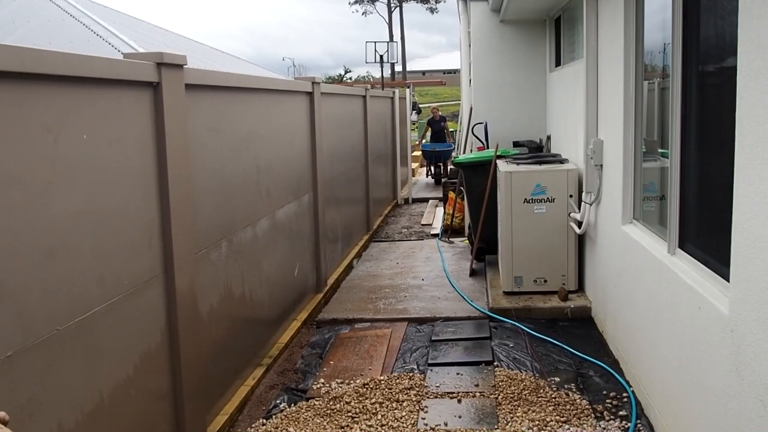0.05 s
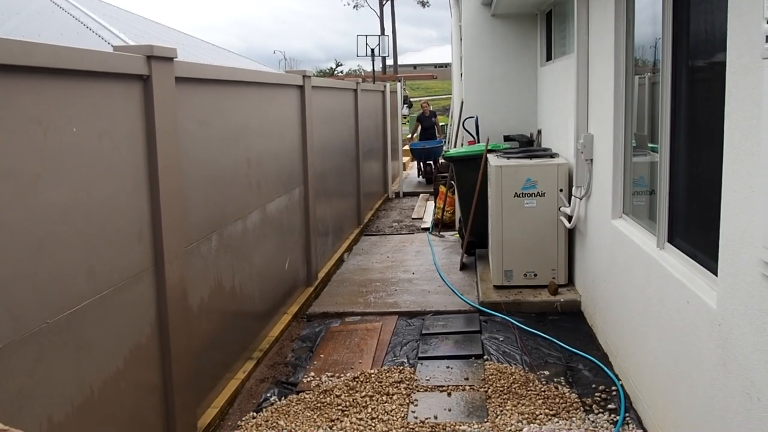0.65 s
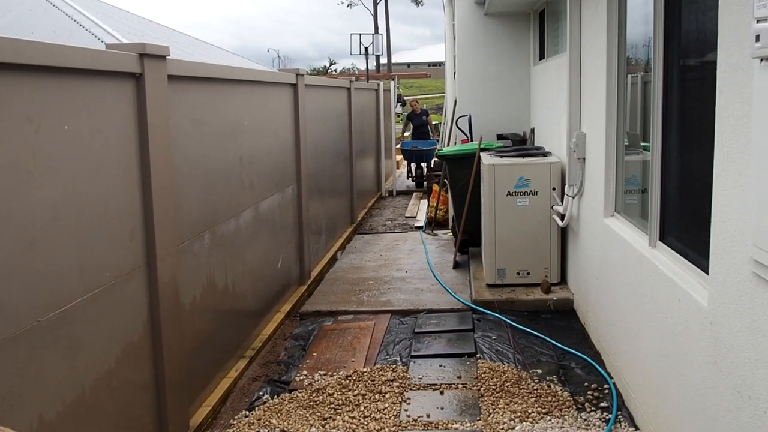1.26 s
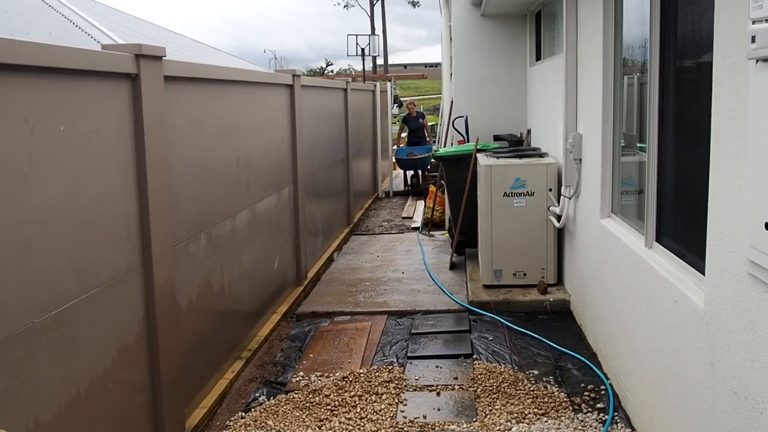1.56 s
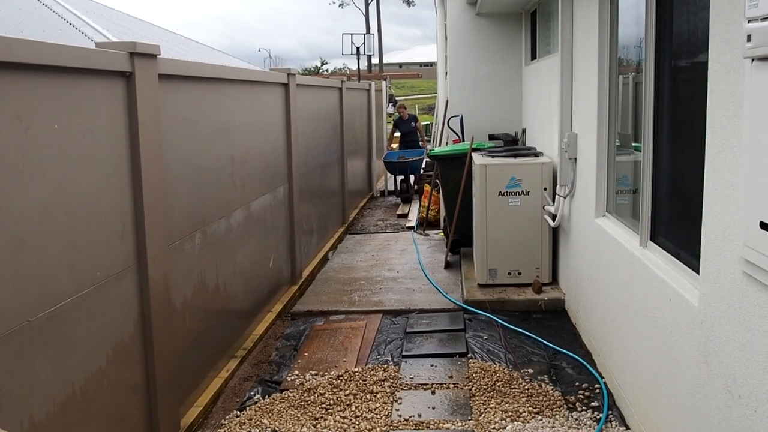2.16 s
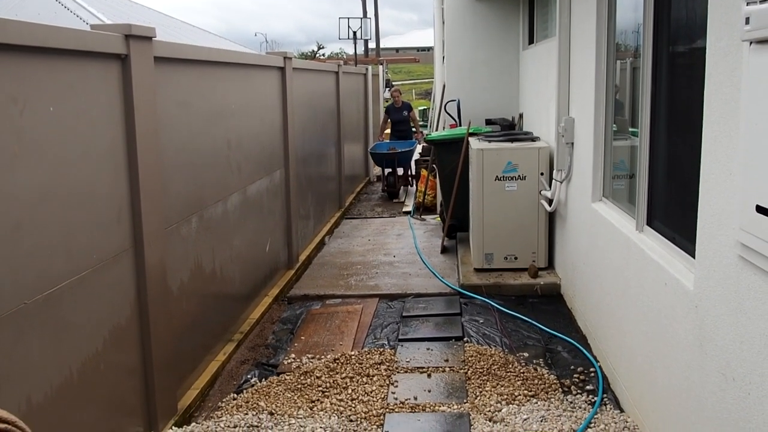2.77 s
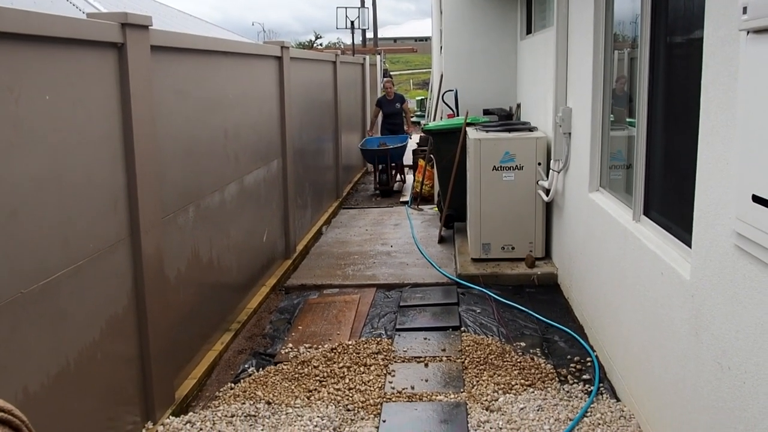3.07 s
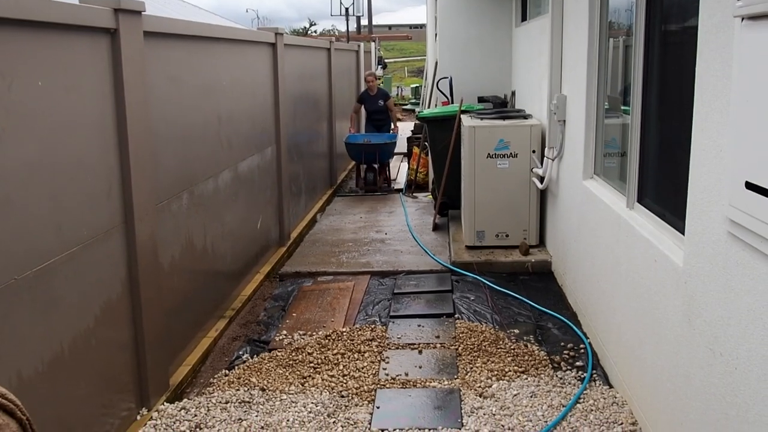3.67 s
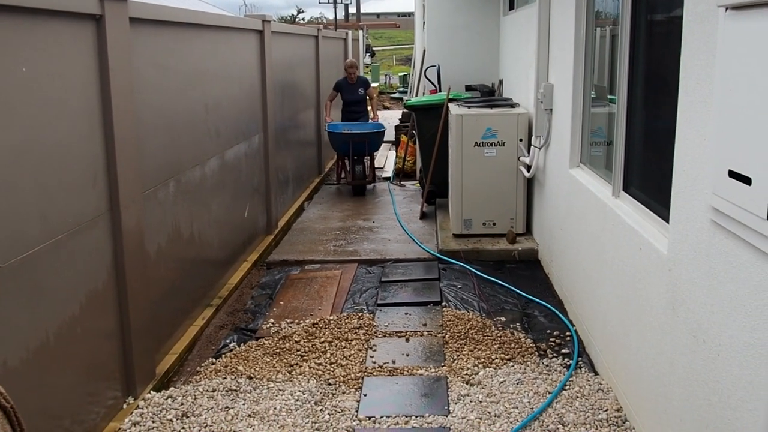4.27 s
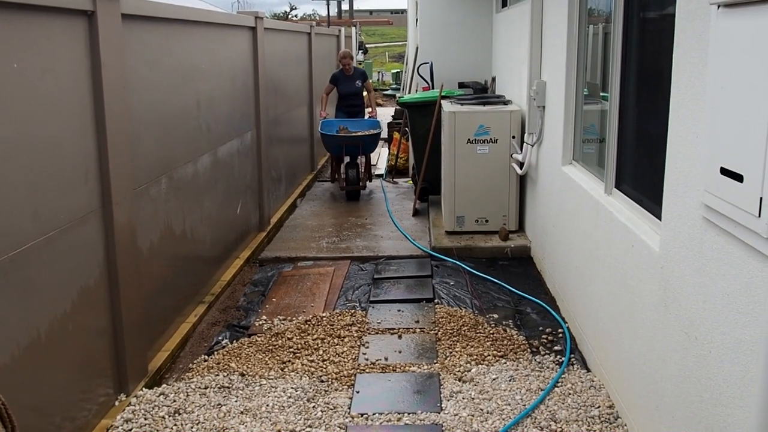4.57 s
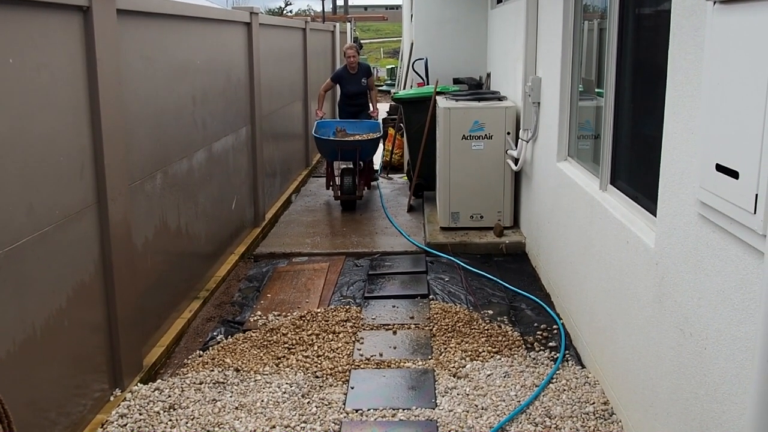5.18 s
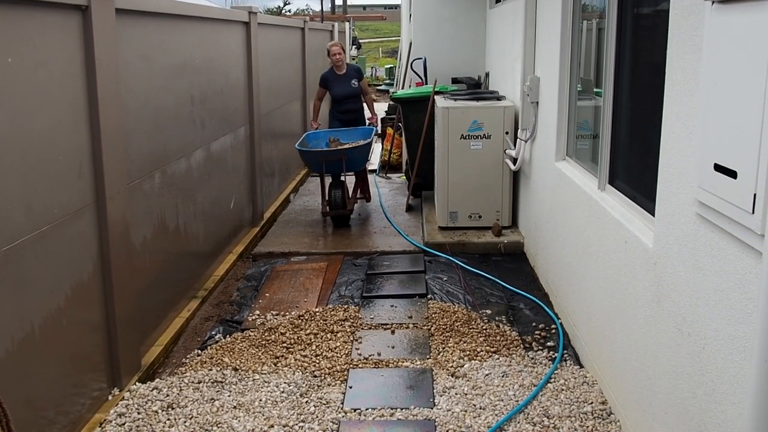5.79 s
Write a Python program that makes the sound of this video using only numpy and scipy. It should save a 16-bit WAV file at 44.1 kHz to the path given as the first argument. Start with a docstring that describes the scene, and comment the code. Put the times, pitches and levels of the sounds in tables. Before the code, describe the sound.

A wheelbarrow loaded with stones approaches along a gritty concrete path outdoors, over a soft hiss and a faint, distant rumble. At first the tyre crackles quietly and unevenly, with small pebble clicks and light shoe scuffs near 0.8 seconds. The load shifts in two sharp crunches at about 1.6 and 1.8 seconds, followed by a bright stone click. From 2 seconds the crackling grows, with scuffing steps and short scrapes just after 3 seconds. The barrow hits bumps at about 3.7, 4.2 and 4.4 seconds: each is a rattling clunk with a brief ring from the tub, the first with a low boom, the last softer. Another loud crunch falls at 4 seconds. From about 4.7 seconds until the end near 6, the tyre crackles on with closer steps and frequent pebble clicks. A fence and a house wall add quick, short reflections.

```python
"""A tyre crackles over grit as a wheelbarrow of stones approaches along a concrete path, shoes scuffing
behind it. Crackle, scuff and the crunch of the shifting load are trains of tiny random impacts, each
with its own spectrum. At three bumps the load strikes the tub: its modes ring in a clunk and the frame
booms on the tyre. A fence and a house wall reflect these sounds as quick slaps and a short
reverberation, over a soft outdoor hiss and a far rumble."""
import sys
import numpy as np
from scipy import signal
from scipy.fft import rfft, irfft
from scipy.io import wavfile

SR = 44100
rng = np.random.default_rng(int(sys.argv[2]) if len(sys.argv) > 2 else 0)


def inscribe(sig):
    """Save sig as 16-bit PCM at rate SR to the path in sys.argv[1].

    A 1-D sig is mono; a 2-D sig holds one channel per row.
    Samples are clipped to [-1, 1] before scaling.
    """
    pcm = np.round(np.clip(np.atleast_2d(sig).T, -1, 1) * 32767)
    wavfile.write(sys.argv[1], SR, pcm.astype(np.int16))


N = 261632
TIME = np.arange(N) / SR

# spectra of coarse grit and of fine sand: (frequency [Hz], level [dB])
GRIT_SPECTRUM = [(100, -18.5), (500, -23), (800, -7), (1200, -2.5), (2500, -2), (4300, -4.5), (5200, -13.5),
                 (9000, -23)]
SAND_SPECTRUM = [(2500, -14.5), (4800, -2.5), (6200, -2), (7800, 2), (10500, -2), (13500, 1), (16000, -12)]
# shoes land: (time [s], scuff level [dB], length [s], heel thud level [dB], surge of the tyre [dB])
FOOTFALLS = [(0.754, -44.5, 0.0408, -52, -4.5), (.85, -43, 0.0239, -52.5, -3),
             (1.668, -40.5, 0.0548, -36.5, 0.5), (2.172, -36, 0.0224, -42.5, 4.5),
             (2.599, -35, 0.052, -42.5, 8), (3.491, -38, 0.0408, -44.5, 15),
             (4.889, -40.5, .029, -44.5, 2.5), (5.39, -32.5, 0.0221, -44.5, 3),
             (5.768, -29, 0.036, -40.5, 7.5)]


def amp(db):
    """Amplitude ratio: a factor of ten for every 20 dB."""
    return 10 ** (np.asarray(db) / 20)


def unit_rms(x):
    """Power normalisation: scales to an rms of one."""
    return x / np.sqrt(np.mean(x ** 2) + 1e-20)


def curve_at(points, hz):
    """Interpolation on a logarithmic frequency axis."""
    f, value = np.transpose(points)
    return np.interp(np.log(hz + 1), np.log(f + 1), value)


def add(mix, s, sound):
    """Superposition: a sound joins the mix at s seconds."""
    part = mix[max(round(s * SR), 0):][:len(sound)]
    part += sound[:len(part)]


def resonance(hz, skirt_db):
    """Spectrum of a broad resonance, falling to skirt_db about a quarter octave to each side."""
    return [(hz / 6, 5 * skirt_db), (hz / 1.1764, skirt_db), (hz / 1.136, 0), (hz * 1.102, 0),
            (hz * 1.206, skirt_db), (hz * 3, 3 * skirt_db), (hz * 8, 5.49 * skirt_db)]


def colour(x, spectrum, size=4096):
    """Minimum-phase filtering to the given spectrum; white noise keeps its power."""
    hz = abs(np.fft.fftfreq(size, 1 / SR))
    log_gain = np.log(unit_rms(amp(curve_at(spectrum, hz))))
    taps = np.fft.ifft(np.exp(np.conj(signal.hilbert(log_gain)))).real[:size // 2]
    return signal.oaconvolve(x, taps)[:len(x)]


def waver(depth_db, step_s, count):
    """Random amplitude modulation: a gain of rms one that glides to a new level every step_s."""
    drift = np.interp(TIME[:count] / step_s, np.arange(3000), rng.standard_normal(3000))
    return unit_rms(amp(depth_db * drift))


def grains(count, per_s, spread_db):
    """Shot noise: a Poisson train of tiny impacts of uneven size, rms one."""
    size = amp(spread_db * np.minimum(rng.exponential(1, count), 4)) * rng.choice([-1, 1], count)
    return unit_rms(size * (rng.random(count) < per_s / SR))


def burst(length, per_s, spread_db):
    """Gated shot noise: a cluster of impacts that starts abruptly and fades."""
    progress = np.linspace(0, 1, max(round(length * SR), 20))
    envelope = abs(np.sin(np.pi * progress ** 0.737)) ** 0.32
    return unit_rms(grains(len(progress), per_s, spread_db) * envelope)


def diffuse(a, b):
    """Diffuse-field coherence: two unrelated signals become left and right, most alike in the bass."""
    # likeness of left and right: (frequency [Hz], coherence [0..1])
    likeness = [(100, 0.946), (500, 0.759), (1000, 0.814), (2000, 0.46), (3800, 0), (16000, 0.227)]
    coherence = curve_at(likeness, np.fft.rfftfreq(len(a), 1 / SR))
    mid = rfft(a) * np.sqrt((1 + coherence) / 2)
    side = rfft(b) * np.sqrt((1 - coherence) / 2)
    return irfft(np.array([mid + side, mid - side]), len(a))


def air():
    """Ambient noise: a diffuse hiss over a far rumble, both dipping briefly after the clunks."""
    # outdoor hiss: (frequency [Hz], level [dB])
    hiss_spectrum = [(20, -15), (60, -13), (130, -0.5), (300, -5), (900, -5.5), (1800, -8.5), (4400, -9),
                     (5200, -17.5), (9000, -17.5), (15000, -28.5)]
    # envelopes of hiss and rumble: (time [s], level [dB])
    hiss_levels = [(0, -48.5), (1.3, -47.5), (1.55, -50), (3.6, -44), (4.1, -42), (4.6, -50.5),
                   (5.0, -47.5), (5.93, -46.5)]
    rumble_levels = [(0, -60), (2.5, -65.5), (4.0, -63), (4.3, -73.5), (4.6, -74), (5.0, -63)]
    hiss = diffuse(*[colour(rng.standard_normal(N), hiss_spectrum) for _ in range(2)])
    rumble = diffuse(*[colour(rng.standard_normal(N), resonance(74.4, skirt_db=-9.5)) for _ in range(2)])
    hiss *= amp(np.interp(TIME, *np.transpose(hiss_levels)))
    rumble *= amp(np.interp(TIME, *np.transpose(rumble_levels)))
    return hiss + rumble


def passage(x, early_db, tail_db, early_t60=0.0845, spots=3):
    """Reverberation: direct sound, early slaps between fence and wall, and a tail that decays by band."""
    # decay of the tail: (frequency [Hz], t60 [s])
    decay_times = [(100, 0.7), (300, 0.565), (1000, 0.389), (3500, 0.3174), (7000, 0.356), (14000, 0.226)]
    # the roofless passage gives back little bass: (frequency [Hz], level [dB])
    reflectance = [(150, -16.5), (300, -9), (600, 0.5), (1200, 0), (3000, 2), (14000, 0)]
    t = TIME[:SR * 2 // 3]
    out = np.array([np.roll(x, 1), x])  # the path to the left is one sample longer
    reflected = irfft(rfft(x) * amp(curve_at(reflectance, np.fft.rfftfreq(N, 1 / SR))), N)
    for k in range(spots):
        slaps = diffuse(*[grains(len(t), per_s=1500, spread_db=3.28) for _ in range(2)])
        slaps *= amp(-60 * t / early_t60) * (t > .002)
        hz, at, bands = signal.stft(diffuse(*rng.standard_normal((2, len(t)))), SR, nperseg=256)
        bands *= amp(-60 * at / curve_at(decay_times, hz)[:, None])
        tail = signal.istft(bands, SR, nperseg=256)[1][:, :len(t)]
        tail *= 1 - np.exp(-t / 0.01096)
        response = (amp(early_db) * unit_rms(slaps) + amp(tail_db) * unit_rms(tail)) / np.sqrt(len(t))
        # each spot has its own reflections; the sound cycles through them at constant power
        share = np.sqrt(2 / spots) * np.cos(np.pi * (17 * TIME + k / spots))
        out += signal.oaconvolve((reflected * share)[None], response, axes=1)[:, :N]
    return out / np.sqrt(1 + amp(early_db) ** 2 + amp(tail_db) ** 2)


def shoes():
    """Friction and impact: the sole grinds grit as the heel thuds, then again, softer, at the toe."""
    # spectra of the scuff and the thud: (frequency [Hz], level [dB])
    scuff_spectrum = [(150, -11), (400, 0.5), (680, 6.5), (1000, 3.5), (1800, 1.5), (3100, 1.5), (4500, -2),
                      (5300, -8), (7500, -6), (13000, -10.5), (16000, -17.5)]
    thud_spectrum = [(40, -19), (100, -11), (165, 5), (260, -6), (400, -27.5), (900, -33.5), (3000, -86)]
    heel, toe = (0, 0, 0), (.05, -8, -6)  # (delay [s], scuff gain [dB], thud gain [dB])
    scuff, thud = np.zeros((2, N))
    for s, scuff_db, length, thud_db, _ in FOOTFALLS:
        for delay, scuff_gain_db, thud_gain_db in (heel, toe):
            add(scuff, s + delay, amp(scuff_db + scuff_gain_db) * burst(length, per_s=1100, spread_db=3))
            add(thud, s + delay, amp(thud_db + thud_gain_db) * burst(length, per_s=2000, spread_db=1))
    return colour(scuff, scuff_spectrum) + colour(thud, thud_spectrum)


def rolling(lag_s=0.0238, surge_s=0.0403):
    """Rolling contact: tyre level and relative fizz in dB follow the path; steps shove the barrow."""
    # how hard the tyre grinds: (time [s], level [dB], fizz relative to the level [dB])
    grinding = [(0, -44, -14.5), (0.12, -48.5, -9), (0.64, -60.5, -3.5), (0.76, -44.5, -11.5),
                (1.2, -50.5, -5.5), (1.5, -58, -7.5), (2.03, -41, -8), (2.3, -39.5, -10), (2.42, -36, -10),
                (2.9, -43, -9.5), (3.16, -33, -9), (3.34, -43, -13), (3.93, -40.5, -7), (4.02, -31.5, -5.5),
                (4.62, -49, -20), (4.98, -39, -12.5), (5.3, -43, -8), (5.45, -36, -8), (5.93, -39, -10.5)]
    s, level_db, fizz_db = np.transpose(grinding)
    surge_db = sum(db * np.exp(-((TIME - at - lag_s) / surge_s) ** 2) for at, *_, db in FOOTFALLS)
    return np.interp(TIME, s, level_db) + surge_db, np.interp(TIME, s, fizz_db)


def strays(per_s=6, boost_db=10, low_hz=1430, high_hz=3530):
    """Poisson events (time, level, pitch): the tyre flicks stones, louder where it grinds harder."""
    at = np.flatnonzero(rng.random(N) < per_s / SR)
    tyre_db, _ = rolling()
    pitch_hz = low_hz * (high_hz / low_hz) ** rng.random(len(at))
    return list(zip(TIME[at], tyre_db[at] + boost_db, pitch_hz))


def pebbles(click_decay_s=0.00338):
    """Stick-slip and impact: loose stones rasp or click, each through a resonance at its own pitch."""
    # sand or a stone drags under the tyre: (time [s], level [dB], length [s], pitch [Hz])
    scrapes = [(0.763, -57.5, 0.516, 8080), (1.002, -47, 0.174, 3685), (3.112, -37, 0.109, 3210),
               (3.283, -33, 0.0308, 1272), (3.944, -43.5, 0.0296, 6500), (5.021, -36, 0.0263, 2350),
               (5.384, -35.5, 0.03, 7480), (5.776, -31.5, 0.0186, 2410)]
    # the loudest single stones: (time [s], level [dB], pitch [Hz])
    clicks = [(0.164, -30, 2860), (0.245, -28, 2850), (0.935, -28, 1720), (1.27, -33.5, 2540),
              (1.38, -33.5, 1900), (1.965, -16, 3010), (2.191, -20, 2480), (2.25, -23.5, 1580),
              (3.206, -20.5, 2180), (3.262, -20.5, 1550), (4.745, -26, 2550), (4.864, -22, 2427),
              (5.098, -24, 1560), (5.377, -20, 2440), (5.609, -19.5, 1750), (5.687, -22.5, 2050),
              (5.745, -21.5, 3160), (5.909, -21.5, 2210)]
    out, t = np.zeros(N), TIME[:2048]
    for s, db, length, hz in scrapes:
        slips = np.pad(burst(length, per_s=2000, spread_db=5), (0, len(t)))
        add(out, s, amp(db) * colour(slips, resonance(hz, skirt_db=-6.5)))
    for s, db, hz in clicks + strays():
        crack = rng.choice([-1, 1], len(t)) * np.exp(-t / click_decay_s)
        peak = resonance(hz, skirt_db=-3)
        body = [(f, max(level, -14) + curve_at(peak, f)) for f, level in GRIT_SPECTRUM]
        add(out, s, amp(db - 1.5) * colour(crack, body))
    return out


def tyre():
    """Granular rolling noise: grit pops in clumps, stones of five sizes tick, fine wet sand fizzes."""
    level, fizz = amp(rolling())
    clumps = waver(depth_db=2.5, step_s=.011, count=N)
    grit = colour(grains(N, per_s=1600, spread_db=3.5), GRIT_SPECTRUM)
    ticks = unit_rms(sum(colour(grains(N, per_s=60, spread_db=0.5), resonance(hz, skirt_db=-12.5))
                         for hz in (1188, 1583.4, 2398, 2953, 3838)))
    sand = colour(grains(N, per_s=450, spread_db=2.5), SAND_SPECTRUM)
    sand *= waver(depth_db=1.5, step_s=.03, count=N)
    return level * clumps * (amp(-3) * grit + amp(-5.5) * ticks + amp(-0.5) * fizz * sand)


def load(slip_s=.03, settle_s=0.0343):
    """Granular avalanche: stones slip, the load gives way in many collisions, the last ones settle."""
    # the load shifts: (time [s], level [dB], length [s])
    crunches = [(1.639, -13.5, 0.03416), (1.821, -19.5, 0.0538), (3.688, -31, 0.034), (4.043, -14, .048)]
    # colliding stones: (frequency [Hz], level [dB])
    stone_spectrum = [(100, -22.5), (380, -14.5), (550, -8), (900, -4.5), (1600, 0.5), (2100, -2.5),
                      (2900, 0.5), (4200, 0.5), (5200, -6.5), (8000, -24.5)]
    coarse, fine = np.zeros((2, N))
    for s, db, length in crunches:
        # stages: (time [s], level [dB], length [s], swell [dB], relative fizz [dB])
        slip = s - slip_s, db - 12.5, slip_s, 14.5, -10.5
        slide = s, db, length, 1, -6.5
        settle = s + length, db - 13.5, settle_s, 0, -6.5
        for at, level_db, span, swell_db, fizz_db in (slip, slide, settle):
            edges = burst(span, per_s=5000, spread_db=1.5)
            sand = burst(span, per_s=6000, spread_db=1)
            gain = amp(level_db + swell_db * np.linspace(-.5, .5, len(edges)))
            add(coarse, at, gain * edges)
            add(fine, at, gain * amp(fizz_db) * sand)
    return amp(2) * (colour(coarse, stone_spectrum) + colour(fine, SAND_SPECTRUM))


def boom(hz, t60=0.167, blur_db=-5):
    """Damped mass on a spring: the frame bounces on its tyre, its low note blurred by the stones."""
    t = TIME[:SR]
    fade = amp(-60 * t / t60)
    note = np.sin(2 * np.pi * hz * t) * (1 - np.exp(-t / 0.0069))
    rattle = colour(rng.standard_normal(len(t)) * fade, resonance(hz, skirt_db=-9))
    blur = unit_rms(rattle) * np.sqrt(np.mean(fade ** 2))
    return note * fade + amp(blur_db) * blur


def blow(db, length, edge_hz, ring_db, boom_db, boom_hz, steepness=5.55):
    """Modal excitation: the load chatters on the panels, the tub rings on, and the frame booms."""
    # modes of the tub: (frequency [Hz], level [dB], t60 [s])
    tub_modes = [(212.4, -12, .3), (244.3, -3, 0.68), (285, -10.5, 1), (445.8, -9, 0.492),
                 (609.1, -7, 0.295), (687.5, -8, 0.417), (778, -3.5, 0.342), (1003.5, -5.5, 0.24),
                 (1123.6, 0.5, 0.173), (1235, 1.5, 0.233), (1414, -14, 0.28), (1625, -0.5, 0.32),
                 (1684.6, 6, 0.206), (2100, 1.5, 0.183), (2433, -5.5, .28), (2830, 3, 0.265),
                 (3080, -2, 0.26), (3430, 0.5, 0.22), (3790, 0.5, 0.206)]
    # struck panels: (frequency [Hz], level [dB])
    panel_spectrum = [(50, -28.5), (120, -23), (220, -6.5), (340, -10.5), (520, -6.5), (750, 0.5),
                      (900, -3), (1100, -0.5), (1700, 1), (3800, 4), (5200, -0.5), (12000, -8.5)]
    t = TIME[:SR]
    hz, mode_db, t60 = np.transpose(tub_modes)[:, :, None]
    chatter = np.zeros(len(t))
    add(chatter, 0, burst(length, per_s=6000, spread_db=3))
    # a soft blow loses the treble above edge_hz; a hard one also misses the lowest modes
    dulled = [(f, level - 10 * np.log10(1 + (f / edge_hz) ** steepness)) for f, level in panel_spectrum]
    excitation = 1 / np.sqrt((1 + (hz / edge_hz) ** steepness) * (1 + (0.139 * edge_hz / hz) ** 2))
    modes = amp(mode_db - 60 * t / t60) * np.sin(2 * np.pi * (hz * t + rng.random(hz.shape)))
    # jostling stones damp each mode unevenly
    modes *= [waver(depth_db=2.5, step_s=0.013, count=len(t)) for _ in tub_modes]
    ring = (modes * excitation).sum(0) * (1 - np.exp(-3 * t / length))
    return amp(db) * colour(chatter, dulled) + amp(ring_db - 1.5) * ring + amp(boom_db + 6.5) * boom(boom_hz)


def tub(rebounds=4, softest_hz=1025):
    """Inelastic collision: the load slams into the tub and rebounds, its chatter ever weaker and duller."""
    # the barrow hits a bump: (time [s], level [dB], chatter length [s], upper edge [Hz], ring [dB],
    # boom [dB], boom pitch [Hz], run-up [s], rebound gap [s], loss per rebound [dB],
    # rebound boom [dB], its change per rebound [dB])
    bumps = [(3.718, -10, 0.01504, 1820, -21, -19.5, 206.1, .035, .024, 8, -27, -3.5),
             (4.179, -9, 0.01402, 4540, -21, -34.5, 164.4, .007, 0.0484, 3.5, -44, 1.5),
             (4.427, -16.5, .024, 2970, -33.5, -28, 240.9, .013, .021, 5.5, -26, -6)]
    out = np.zeros(N)
    for (s, db, length, edge_hz, ring_db, boom_db, boom_hz,
         run_up, gap, loss_db, rebound_boom_db, boom_change_db) in bumps:
        # as the tyre climbs the bump, the load rattles and the frame's note is lower
        add(out, s - run_up, blow(-27, run_up, edge_hz, ring_db - 8.5, boom_db - 6, boom_hz * 0.818))
        add(out, s, blow(db, length, edge_hz, ring_db, boom_db, boom_hz))
        for k in range(rebounds):
            soft_hz = softest_hz + (edge_hz - softest_hz) * 0.47 ** (k + 1)
            note_hz = boom_hz * np.exp(0.0963 * rng.uniform(-1.89, 2.02))  # varies as the load moves
            rebound = blow(db - 11.5 - k * loss_db, gap, soft_hz, ring_db - 4 - k * loss_db,
                           rebound_boom_db + k * boom_change_db, note_hz)
            add(out, s + length + k * gap, rebound)
    return amp(-1.5) * out


def scene():
    """Superposition: each source reverberates in the passage, over the open air."""
    ground = passage(tyre() + shoes(), early_db=0, tail_db=-4)
    crunches = passage(load(), early_db=-0.5, tail_db=-4.5)
    clicks = passage(pebbles(), early_db=0, tail_db=-2.5)
    clunks = passage(tub(), early_db=-3, tail_db=-8)
    return air() + ground + crunches + clicks + clunks


def record(dry, offset=-.0034, cutoff_hz=15900):
    """Slight left-right colouring, soft saturation of the peaks, a steady offset, then a low-pass."""
    # balance of the channels: (frequency [Hz], left minus right [dB])
    balance = [(60, 0.5), (130, -0.5), (290, -0.5), (640, 0.0), (1410, -1.0), (3100, -1.0), (6820, 1),
               (15000, 1.5)]
    tilt_db = curve_at(balance, np.fft.rfftfreq(N, 1 / SR))
    tilted = irfft(rfft(dry) * amp(np.array([tilt_db, -tilt_db]) / 2), N)
    rounded = offset + tilted / (1 + tilted ** 10) ** (1 / 10)
    taps = signal.firwin(511, cutoff_hz, window=("kaiser", 9), fs=SR)
    return signal.oaconvolve(rounded, taps[None], "same")


dry = scene()
out = record(dry)
inscribe(out)
```